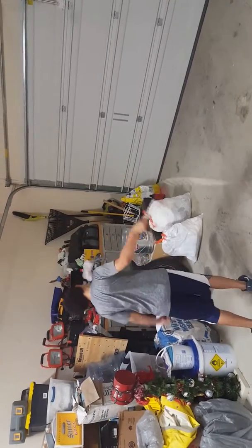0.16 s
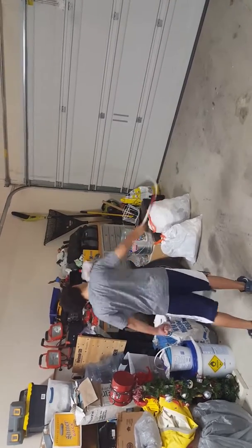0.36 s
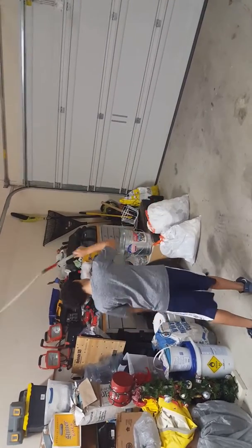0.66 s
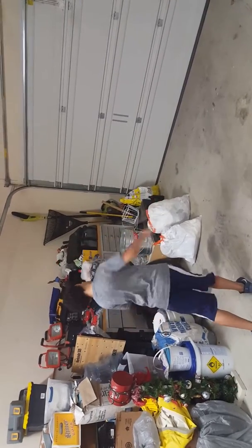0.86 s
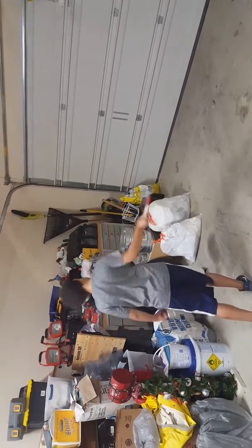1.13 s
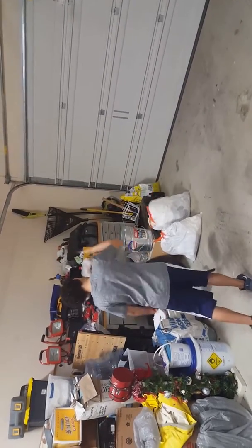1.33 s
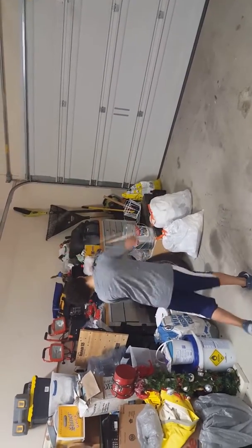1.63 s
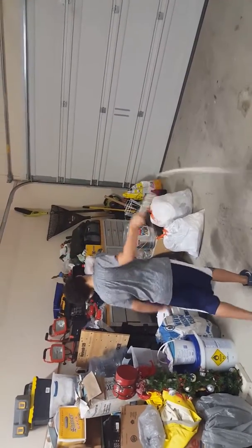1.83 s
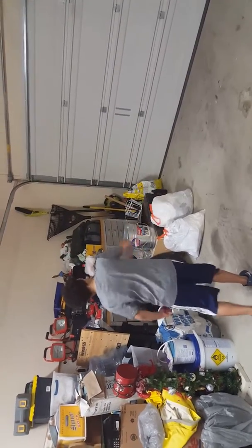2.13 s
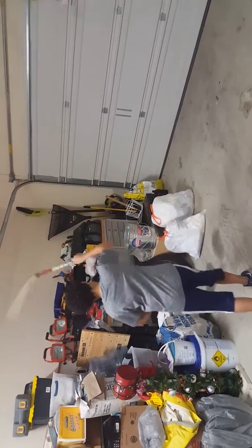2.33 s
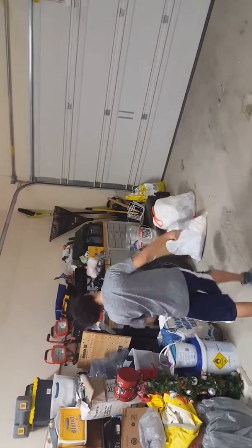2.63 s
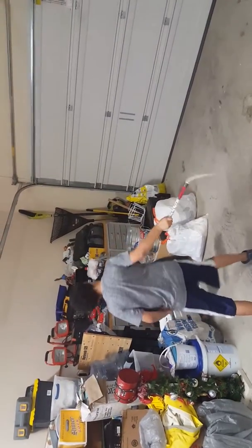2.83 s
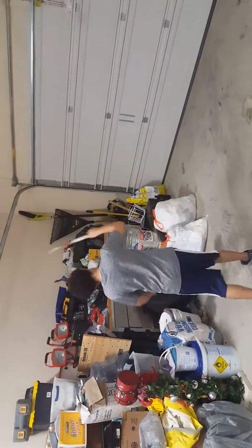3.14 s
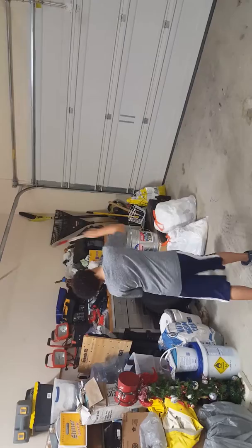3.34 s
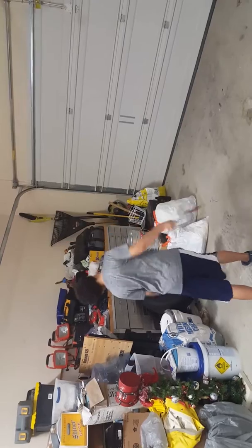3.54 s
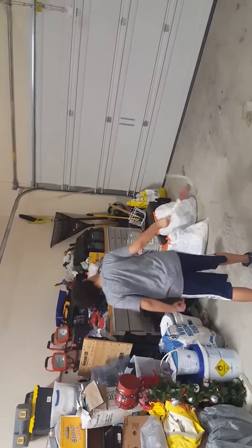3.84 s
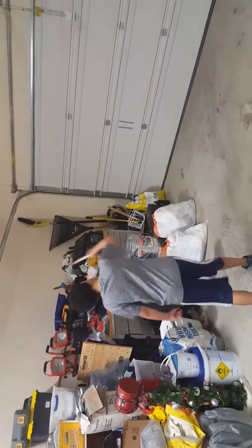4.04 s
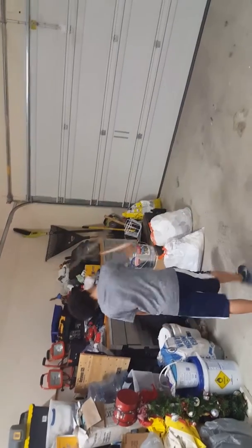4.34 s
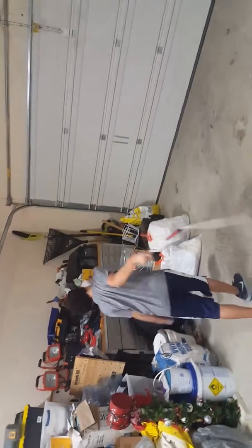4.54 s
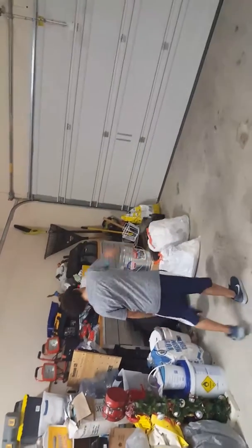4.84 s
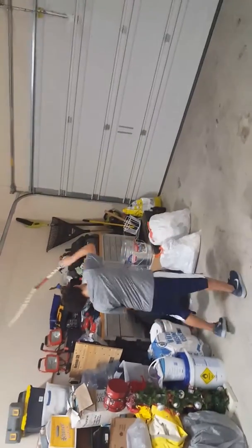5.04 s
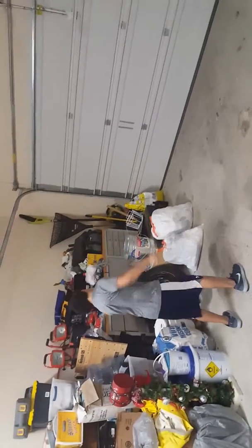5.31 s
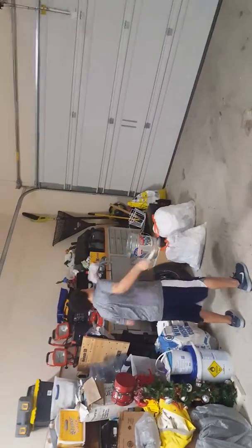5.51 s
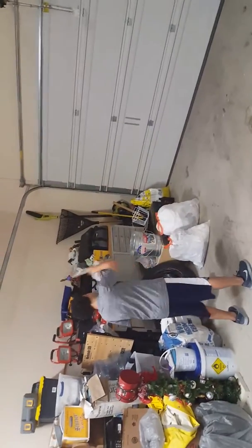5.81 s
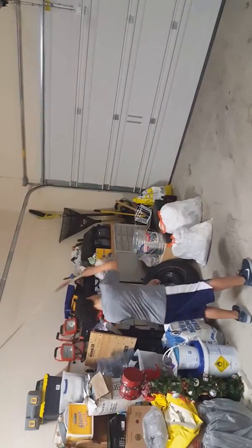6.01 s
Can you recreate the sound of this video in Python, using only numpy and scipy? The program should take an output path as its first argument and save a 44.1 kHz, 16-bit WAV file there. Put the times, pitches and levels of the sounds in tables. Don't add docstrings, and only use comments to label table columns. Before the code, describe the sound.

In a cluttered concrete garage, heard in stereo by a phone a few metres away, the echo of a previous whip crack is already dying at the start. Cracks follow at about 0.1, 0.5, 1.0, 1.4, 1.8, 2.2, 2.7, 3.1, 3.6, 4.05, 4.5, 4.9, 5.4 and 5.8 seconds. Each has a very short airy swish, an abrupt snap and a dense, bright tail lasting over half a second. Those near 1.0, 3.1, 3.6, 4.5 and 5.4 are sharp and forceful, 4.5 the hardest with a stinging slap; those near 2.2, 4.05, 4.9 and 5.8 are weaker. Hollow bucket-like knocks colour 0.55, 1.4, 2.7 and 4.9, boxy carton thuds 1.0, 3.6 and 4.5. A faint lash brush comes at 2.4, low shoe shifts between cracks. Quiet air and hum remain underneath; the loudest hits are compressed.

```python
import sys
import numpy as np
from scipy import signal
from scipy.fft import rfft, irfft
from scipy.io import wavfile
from scipy.ndimage import uniform_filter1d

SR = 44100
rng = np.random.default_rng(int(sys.argv[2]) if len(sys.argv) > 2 else 0)


def unload_wav(signal):
    wavfile.write(
        sys.argv[1],
        SR,
        np.round(np.clip(np.atleast_2d(signal).T, -1, 1) * 32767).astype(np.int16),
    )


def natural_amplitude(level_db):
    exponent = np.asarray(level_db, float) / 20
    return 10 ** exponent


N = 272097

# start in seconds, strength in dB, thump in dB, body in dB, snap in dB.
CRACKS = [(-.3, -4.5, 0, 2, -0.5), (0.121, -1, -7, -2, -2), (0.541, -9, -4, 6.5, -3),
          (0.965, -.3, -14.5, -4, 4), (1.3745, -6.5, 2.5, 4, -6), (1.779, -2.5, -6, 1.5, 1),
          (2.193, -15.5, 3, -6, -4.5), (2.6865, -5, 2.2, 6, 2.4), (3.133, -3, -13.5, -0.2, 4.5),
          (3.592, -0.3, -11, -3, 4.5), (4.05, -16, -4, 0.9, -0.5), (4.4847, 4.2, -7, -5, 6.5),
          (4.9367, -13.5, 1.5, 5.5, 1), (5.3684, 2.6, -4.5, -0.8, 3), (5.8046, -22.5, 2, -5, 2.5)]
COLOUR_HZ = [90, 220, 600, 1800, 5000, 13000]
# frequency in Hz, level in dB.
SHOCK_SPECTRUM = [(24, -64), (40, -3), (233, -1), (358, -2.5), (639, -4), (887, -3), (1010, -2),
                  (1470, -2.5), (1620, -1.5), (2250, -3), (5050, -14), (8360, -14), (10200, -27),
                  (14500, -26.5), (16500, -46)]
# frequency in Hz, level in dB.
SWISH_SPECTRUM = [(200, -6), (600, -8), (1500, -2), (2600, -16), (5000, -17), (10000, -36)]
# frequency in Hz, level in dB.
PUNCH_SPECTRUM = [(20, -40), (45, -12), (80, 0), (170, 0), (300, -5), (600, -26)]
# start in seconds, strength in dB,
# weight in dB, snap in dB, scrape length in seconds.
TOUCHES = [
    (0.5377, -19, 8, 5, 0.0063),
    (2.4055, -26.5, -5, 1.5, .004),
    (2.6772, -26, -5, 0.6, .0006),
    (2.69, -8.5, -7, -0.2, 0.00028),
    (4.5004, -1.5, -5, 0, 0.00069),
    (3.13, -14.5, 9.5, -16, 0.001),
    (5.7912, -21.5, -6, -0.5, .0003),
    (1.369, -21, 3, -9, .003),
    (4.928, -28, 1, -4, 0.0055),
    (.1175, -23, -3, -4, .002),
]
# mode in Hz, width in Hz, level in dB.
BUCKET_MODES = [(575, 90, 0.5), (393, 54, -9)]
DRUM_MODES = [(215, 55, 0)]
CARTON_MODES = [(425, 200, 0), (850, 220, -1.5)]
BOARD_MODES = [(1030, 110, -7.5), (1970, 260, -1)]
# start in seconds, level in dB.
ON_BUCKET = [
    (.549, -16),
    (1.381, -17),
    (2.692, -16),
    (4.94, -19),
    (5.806, -36),
]
ON_DRUM = [(2.191, -26), (3.598, -21), (4.941, -27), (4.05, -36), (5.367, -25), (5.805, -39)]
ON_CARTON = [
    (.968, -16.5),
    (3.6, -18.5),
    (4.499, -12),
    (5.375, -22),
]
ON_BOARD = [
    (2.192, -21),
]
# start in seconds, level in dB, length in seconds.
STEPS = [
    (.28, -62, .06),
    (2.44, -56, 0.11),
    (2.865, -44, .03),
    (3.28, -56, .05),
    (3.36, -55, 0.093),
    (3.459, -60, .08),
    (4.545, -30, .035),
    (.545, -40, .045),
]
# frequency in Hz, time to fall 60 dB in seconds.
GARAGE_DECAY = [(100, 0.19), (260, 0.49), (700, 0.66), (1840, 0.73), (4850, 0.72), (12800, 0.5)]
# delay in seconds, left level in dB, right level in dB.
ECHOES = [(0, 0.6, 7), (.0013, 4.5, 5), (.0059, 5.5, -12), (.0088, -8, 0.6), (0.011, 6.5, 2.2),
          (0.0165, 6.5, -6)]
# frequency in Hz, likeness from 0 to 1.
LIKENESS = [(60, .2), (130, .65), (600, .7), (1300, 0), (15000, 0)]
# frequency in Hz, level in dB.
HUM = [(118.4, -64.5), (242.2, -65.5)]
# frequency in Hz, level in dB per Hz.
AIR_SPECTRUM = [(18, -30), (30, -35), (70, -23), (118, -15), (190, -5), (295, -9), (760, 1.5), (2290, -8),
                (8520, -26.5), (16000, -54)]

BASS_CUT_DB = -22
AIRY_DB, AIRY_PER_DB = 3.8, -.08
SOURCE_DB = 8.5
SWISH_DB, SWISH_PER_DB, SWISH_RISE_S = -34, 0.7, 0.0051
SWISH_LENGTH = 4096
PUMP_DB, PUMP_PER_DB, PUMP_TOP_DB, PUMP_S = -21, 5, -19.5, 0.048
NEAR_DB = 1.2
BODY_SHARE = .6
RESPONSE_LENGTH = 3 * SR // 4
MIC_SPACING_S = .0004
ECHO_CUT_HZ = 156
AIR_DB = -49.5


def crack(db, thump_db, body_db, snap_db, air_db):
    hz = np.fft.rfftfreq(4096, 1 / SR)
    colour_db = [thump_db + BASS_CUT_DB, thump_db, body_db, 0, snap_db, air_db]
    tint = read(list(zip(COLOUR_HZ, colour_db)), hz)
    plain_db = read(SHOCK_SPECTRUM, hz)
    return natural_amplitude(db + SOURCE_DB) * causal(plain_db + tint) / np.linalg.norm(causal(plain_db))


def swish(db, rise_s):
    t = np.arange(-SWISH_LENGTH, 0) / SR
    hz = np.fft.rfftfreq(SWISH_LENGTH, 1 / SR)
    white = rfft(rng.standard_normal(SWISH_LENGTH))
    noise = evened(irfft(white * natural_amplitude(read(SWISH_SPECTRUM, hz))))
    return natural_amplitude(db) * noise * np.exp(t / rise_s)


def punch(db, length_s):
    t = np.arange(8192) / SR
    hz = np.fft.rfftfreq(8192, 1 / SR)
    white = rfft(rng.standard_normal((2, 8192)))
    noise = evened(irfft(white * natural_amplitude(read(PUNCH_SPECTRUM, hz))))
    noise[1] = .8 * signal.hilbert(noise[0]).imag + .6 * noise[1]
    hold = (1 - np.exp(-t / 0.001)) * np.exp(-(t / length_s) ** 5)
    return natural_amplitude(db) * noise * hold


def whip_cracks(mix):
    for s, db, *colour in CRACKS:
        shock = crack(db, *colour, AIRY_DB + AIRY_PER_DB * db)
        source = np.concatenate([swish(SWISH_DB + SWISH_PER_DB * db, SWISH_RISE_S), shock])
        heard = signal.fftconvolve(source[None], garage(NEAR_DB), axes=1)
        add(mix, s + .0005 - SWISH_LENGTH / SR, heard)
        add(mix, s, punch(min(PUMP_DB + PUMP_PER_DB * db, PUMP_TOP_DB), PUMP_S))


def lash_touches(mix):
    for s, db, weight_db, snap_db, scrape_s in TOUCHES:
        touch = crack(db, weight_db, BODY_SHARE * weight_db, snap_db, 0)
        add(mix, s, signal.fftconvolve(touch[None], garage(flutter_s=scrape_s), axes=1))


def thud(hz, width, db):
    t = np.arange(4096) / SR
    swell = 1 - np.exp(-t / 0.0017)
    ring = natural_amplitude(db) * np.sin(2 * np.pi * hz * t) * np.exp(-np.pi * width * t) * swell
    return signal.lfilter(*signal.butter(3, hz / 1.6, "high", fs=SR), ring)


def hollow_landings(mix):
    for modes, landings in [(BUCKET_MODES, ON_BUCKET), (DRUM_MODES, ON_DRUM),
                            (CARTON_MODES, ON_CARTON), (BOARD_MODES, ON_BOARD)]:
        ring = sum(thud(*mode) for mode in modes)
        for s, db in landings:
            room = garage(near_db=-3, tail_db=-15, linger=.75)
            echoed = signal.fftconvolve(natural_amplitude(db) * ring[None], room, axes=1)
            direct = np.pad(natural_amplitude(db + SOURCE_DB) * ring, (0, RESPONSE_LENGTH - 1))
            add(mix, s, echoed - direct)


def footsteps(mix):
    for s, db, length_s in STEPS:
        add(mix, s, punch(db, length_s))


def garage(near_db=2, tail_db=-17, flutter_s=0.00054, linger=1.):
    t = np.arange(RESPONSE_LENGTH) / SR
    crowd = np.clip(0.029 + (t / .03) ** 2, 0, 1)
    present = rng.random((2, RESPONSE_LENGTH)) < crowd
    taps = rng.standard_normal((2, RESPONSE_LENGTH)) * present / np.sqrt(crowd)
    taps = taps * (1 - np.exp(-t / 0.0031))
    hz, frames, z = paired(taps, size=256)

    clumps = uniform_filter1d(rng.standard_normal(z.shape[1:]), 6, 0)
    clumps = evened(uniform_filter1d(clumps, 4, 1))
    early_db = 0.5 * np.exp(-frames / 0.054)
    decay_db = 60 * frames / (linger * read(GARAGE_DECAY, hz)[:, None])
    z = z * natural_amplitude(1.12 * clumps + early_db - decay_db)
    out = natural_amplitude(tail_db) * signal.istft(z, SR, nperseg=256)[1][:, :RESPONSE_LENGTH]

    shift = rng.uniform(-1.2, 1, (len(ECHOES), 2))
    for (delay, *side_db), (late, lag) in zip(ECHOES, shift):
        smear = rng.standard_normal((2, 1024)) * np.exp(-t[:1024] / flutter_s)
        smear[1] = 0.69 * smear[0] + 0.45 * smear[1]
        smear[:, 0] = -2.16
        smear = signal.lfilter(*signal.butter(2, ECHO_CUT_HZ, "high", fs=SR), smear)
        at = delay * (1 + .07 * late)
        for side, lead in enumerate([lag, -lag]):
            start = round((at + MIC_SPACING_S * max(lead, 0)) * SR)
            echo = smear[side] / np.linalg.norm(smear[side])
            out[side, start:start + 1024] += natural_amplitude(near_db + side_db[side]) * echo
    return out


def lamp_hum():
    t = np.arange(N) / SR
    waver = evened(uniform_filter1d(rng.standard_normal((len(HUM), N)), 3000))
    hum = np.zeros(N)
    for (hz, db), drift in zip(HUM, waver):
        hum += np.sqrt(2) * natural_amplitude(db + 3.6 * drift) * np.sin(2 * np.pi * hz * t)
    return hum


def still_air():
    hz, _, z = paired(rng.standard_normal((2, N)), size=1024)
    z = z * natural_amplitude(read(AIR_SPECTRUM, hz))[:, None]
    return natural_amplitude(AIR_DB) * evened(signal.istft(z, SR, nperseg=1024)[1][:, :N])


def evened(x):
    return x / np.sqrt(np.mean(x ** 2) + 1e-20)


def read(points, hz):
    f, value = np.transpose(points)
    return np.interp(np.log(hz + 1), np.log(f + 1), value)


def add(mix, s, sound):
    at = round(s * SR)
    sound = sound[:, max(-at, 0):]
    part = mix[:, max(at, 0):][:, :sound.shape[1]]
    part += sound[:, :part.shape[1]]


def causal(gain_db):
    level = np.log(natural_amplitude(np.maximum(gain_db, -90)))
    circle = np.concatenate([level, level[-2:0:-1]])
    return np.fft.ifft(np.exp(circle - 1j * signal.hilbert(circle).imag)).real[:2048]


def paired(x, size):
    hz, t, z = signal.stft(x, SR, nperseg=size)
    share = np.clip(read(LIKENESS, hz), 0, .99)[:, None]
    common, apart = np.sqrt((1 + share) / 2), np.sqrt((1 - share) / 2)
    return hz, t, np.array([common * z[0] + apart * z[1], common * z[0] - apart * z[1]])


def scene():
    mix = np.zeros((2, N))
    whip_cracks(mix)
    lash_touches(mix)
    hollow_landings(mix)
    footsteps(mix)
    return mix + still_air() + lamp_hum()


def low_pass(x):
    return signal.sosfilt(signal.butter(12, 15350, fs=SR, output="sos"), x)


def record(dry):
    dry = signal.sosfilt(signal.butter(2, 55, "high", fs=SR, output="sos"), dry)
    power_db = 10 * np.log10(abs(uniform_filter1d((dry ** 2).mean(0), 130)) + 1e-12)
    fall = np.arange(N) * 90.0 / SR
    peak_db = np.maximum.accumulate(power_db + fall) - fall
    over_db = np.maximum(peak_db + 8.5, 0)
    held = dry / natural_amplitude(.62 * uniform_filter1d(over_db, 60))
    return low_pass(0.96 * np.tanh(held / 0.89))


dry = scene()
out = record(dry)
unload_wav(out)
```